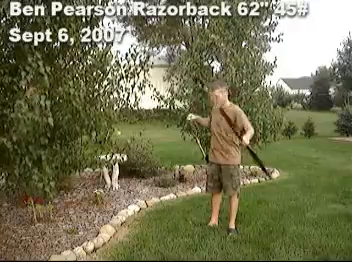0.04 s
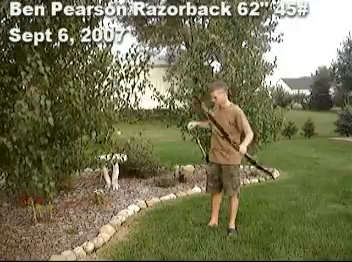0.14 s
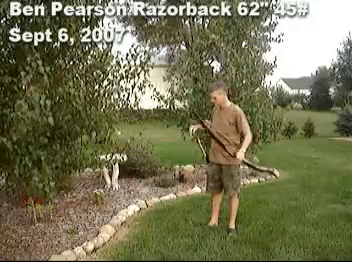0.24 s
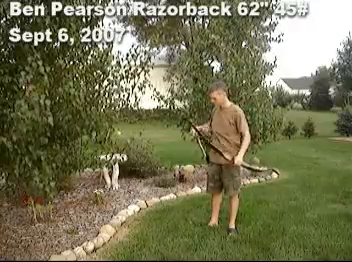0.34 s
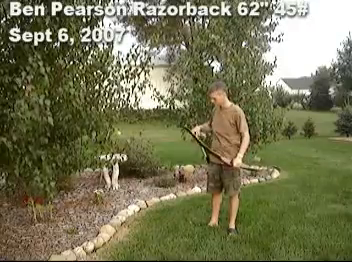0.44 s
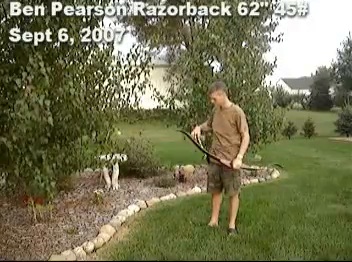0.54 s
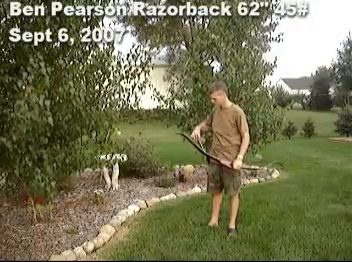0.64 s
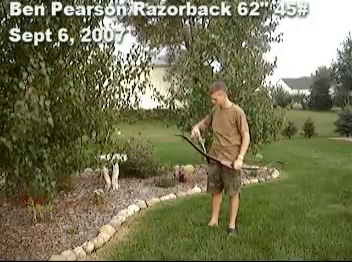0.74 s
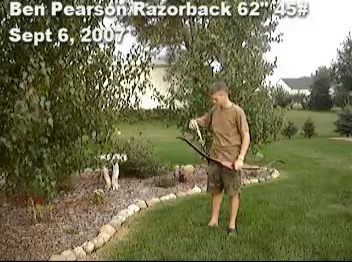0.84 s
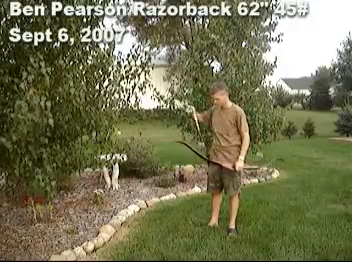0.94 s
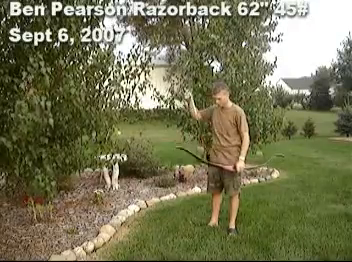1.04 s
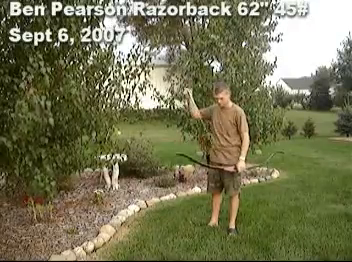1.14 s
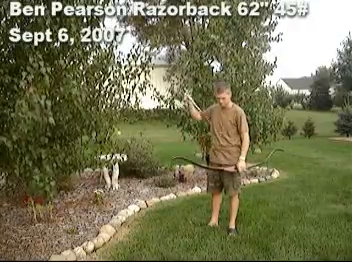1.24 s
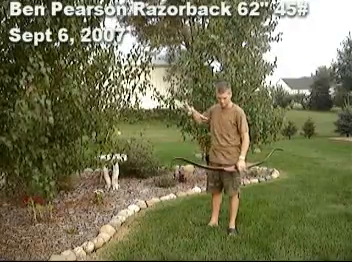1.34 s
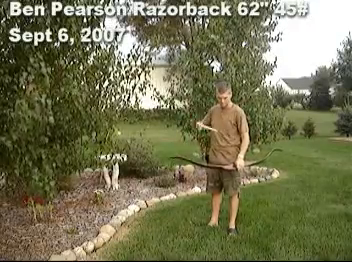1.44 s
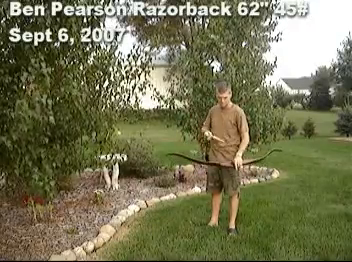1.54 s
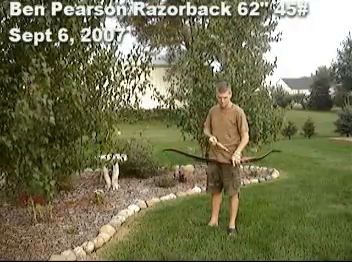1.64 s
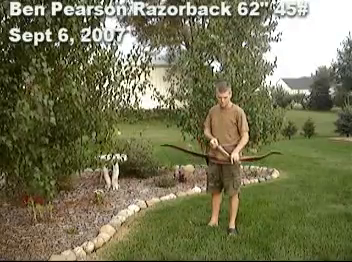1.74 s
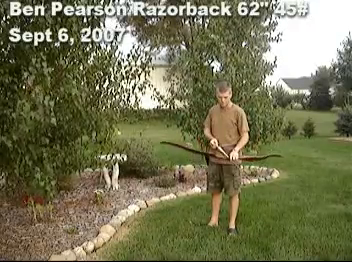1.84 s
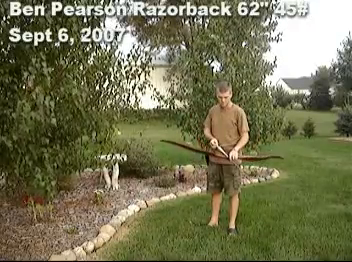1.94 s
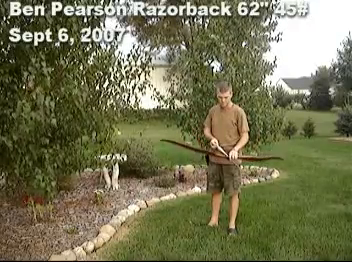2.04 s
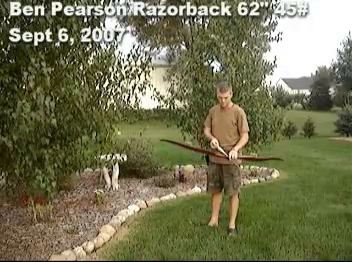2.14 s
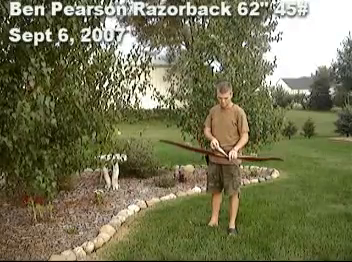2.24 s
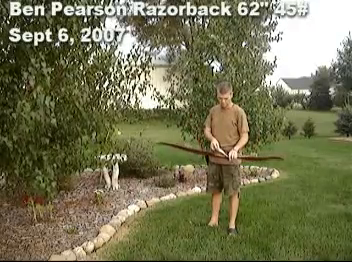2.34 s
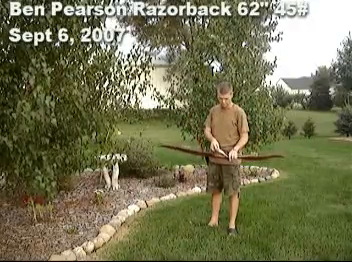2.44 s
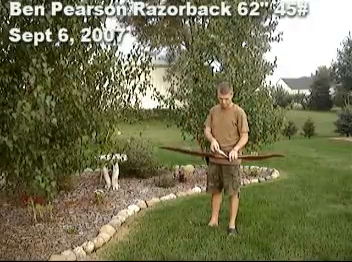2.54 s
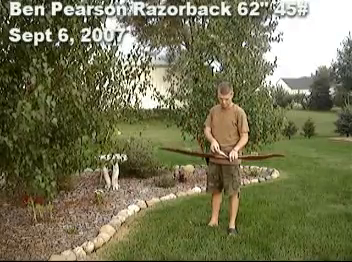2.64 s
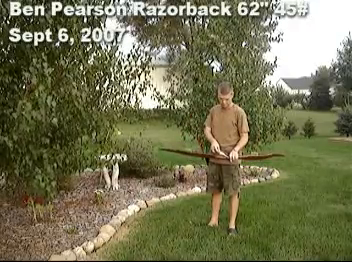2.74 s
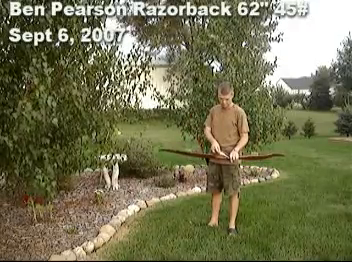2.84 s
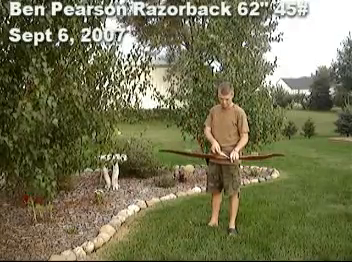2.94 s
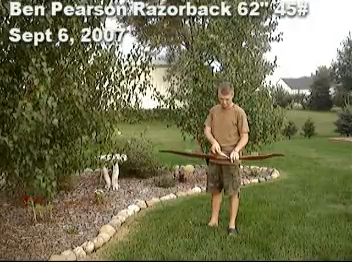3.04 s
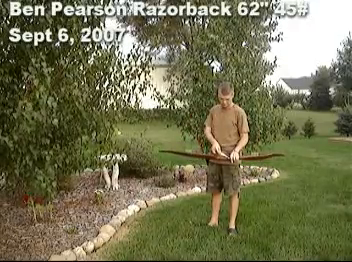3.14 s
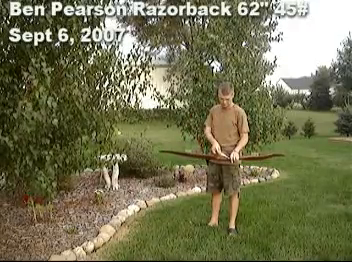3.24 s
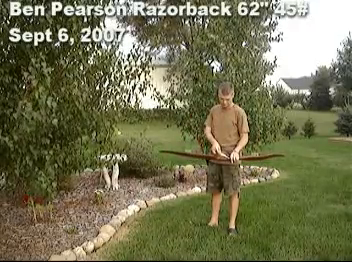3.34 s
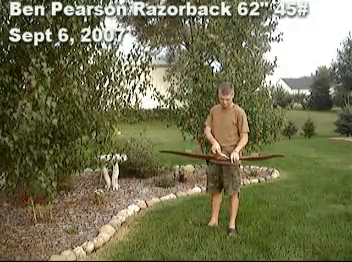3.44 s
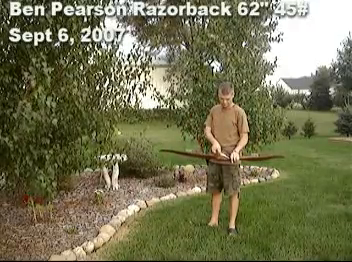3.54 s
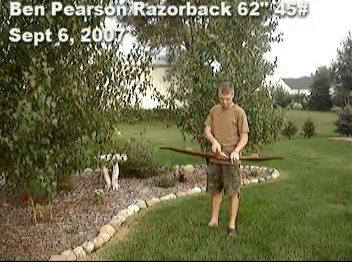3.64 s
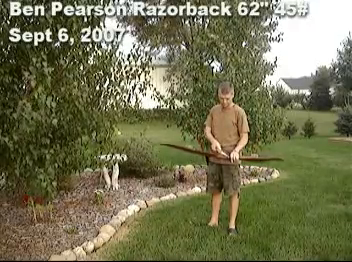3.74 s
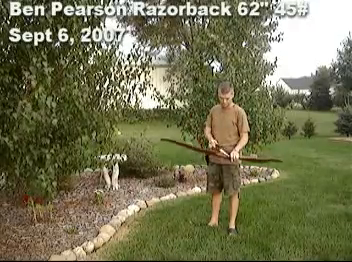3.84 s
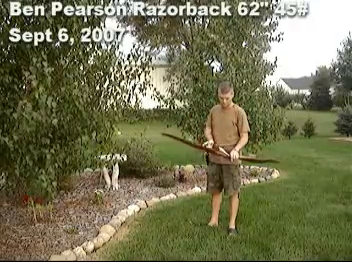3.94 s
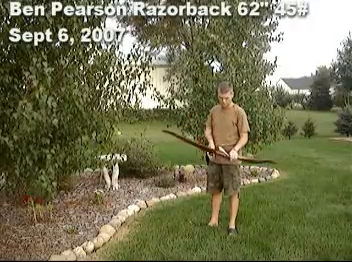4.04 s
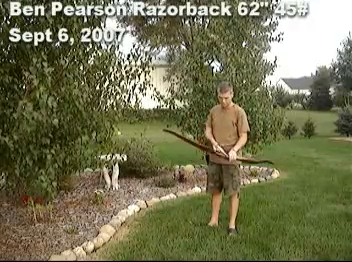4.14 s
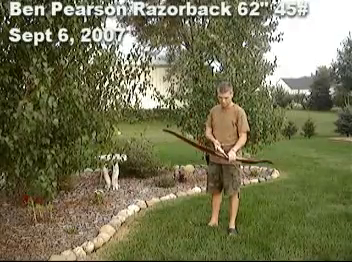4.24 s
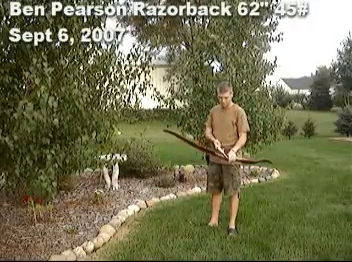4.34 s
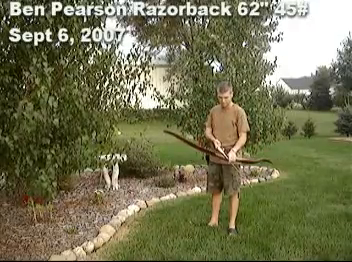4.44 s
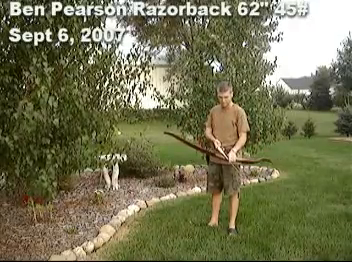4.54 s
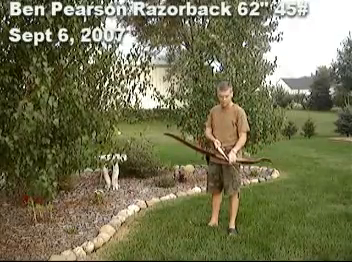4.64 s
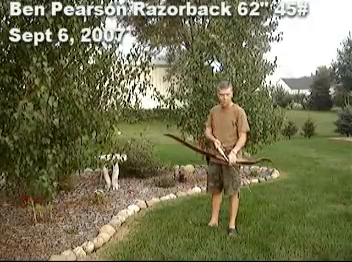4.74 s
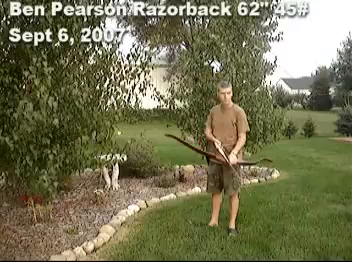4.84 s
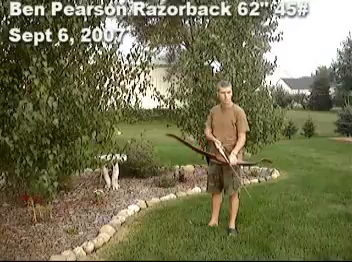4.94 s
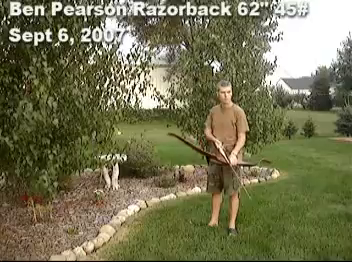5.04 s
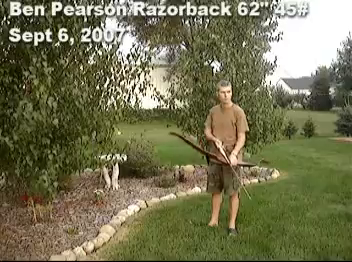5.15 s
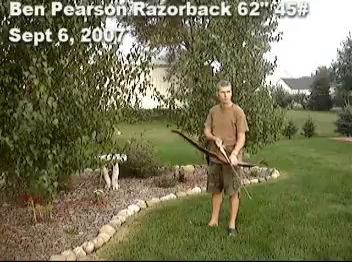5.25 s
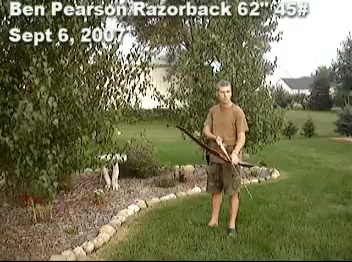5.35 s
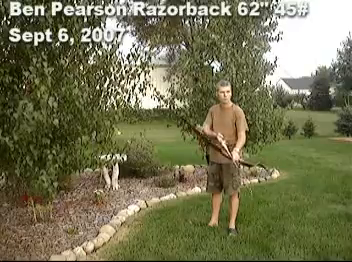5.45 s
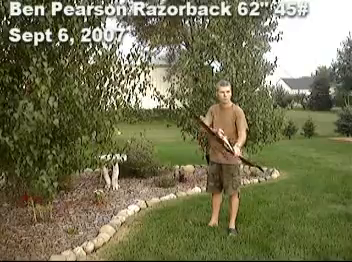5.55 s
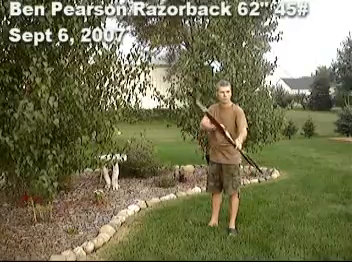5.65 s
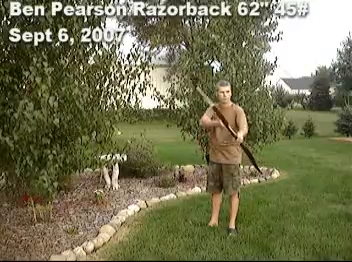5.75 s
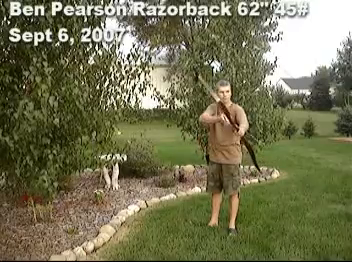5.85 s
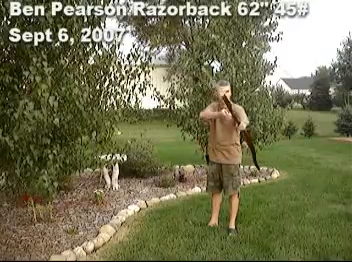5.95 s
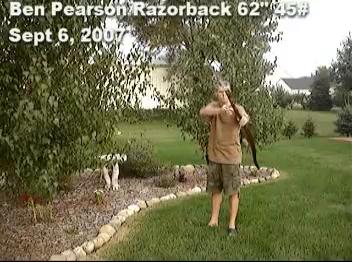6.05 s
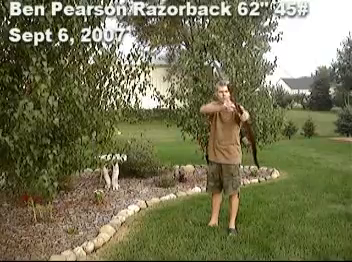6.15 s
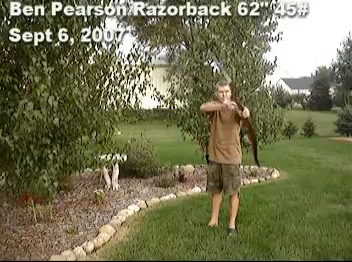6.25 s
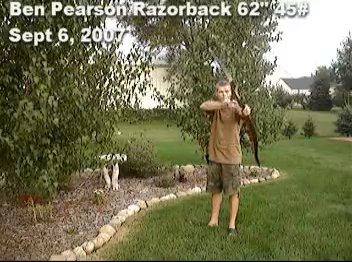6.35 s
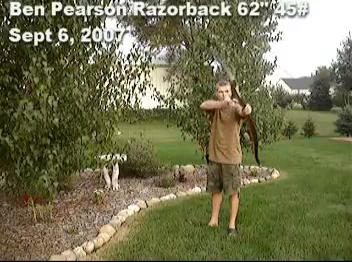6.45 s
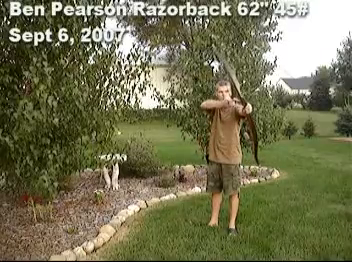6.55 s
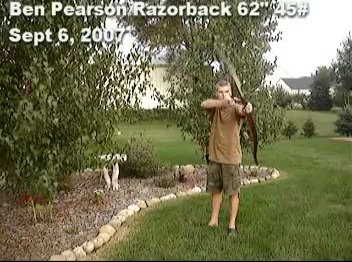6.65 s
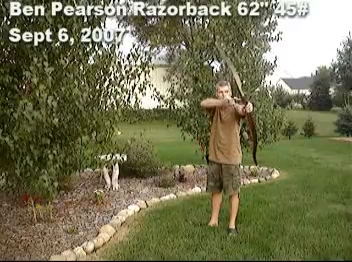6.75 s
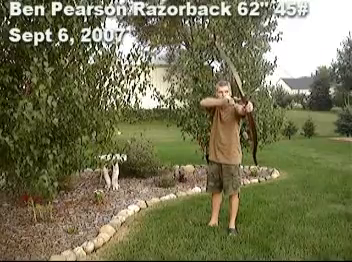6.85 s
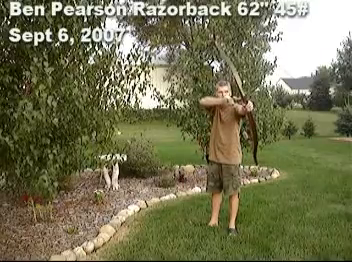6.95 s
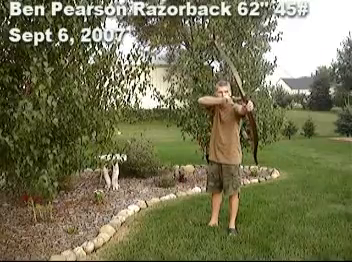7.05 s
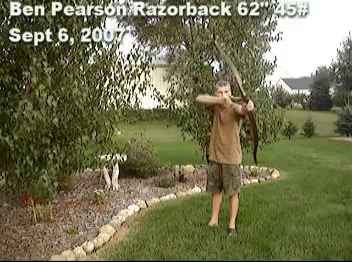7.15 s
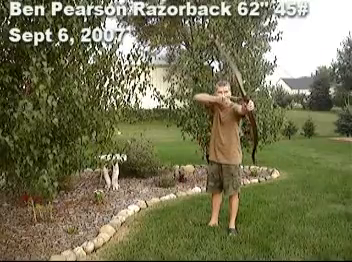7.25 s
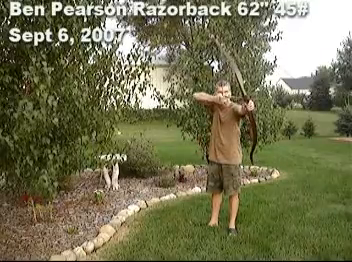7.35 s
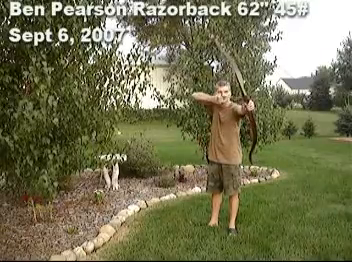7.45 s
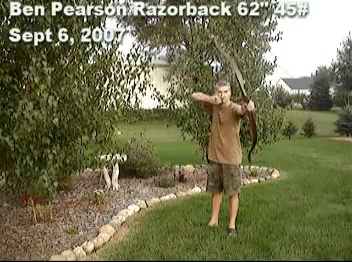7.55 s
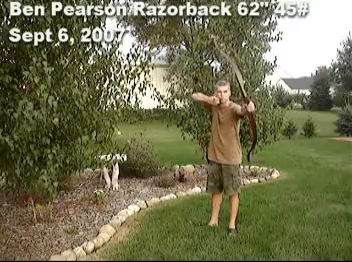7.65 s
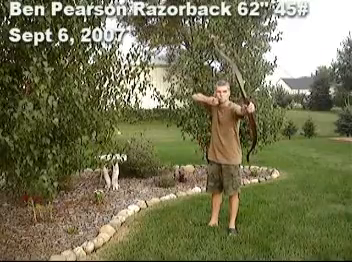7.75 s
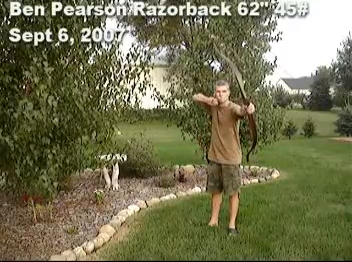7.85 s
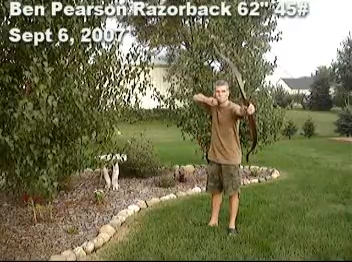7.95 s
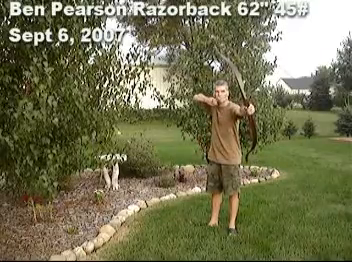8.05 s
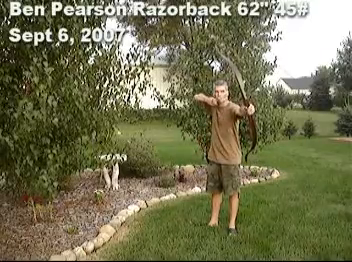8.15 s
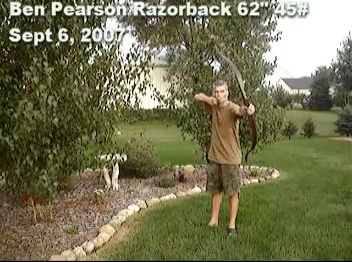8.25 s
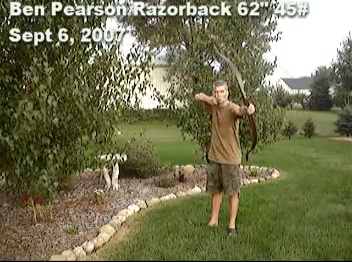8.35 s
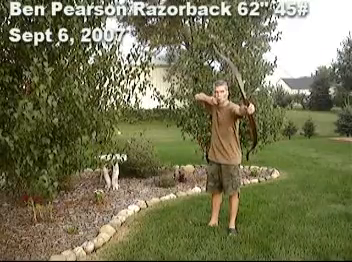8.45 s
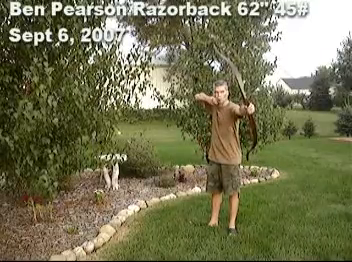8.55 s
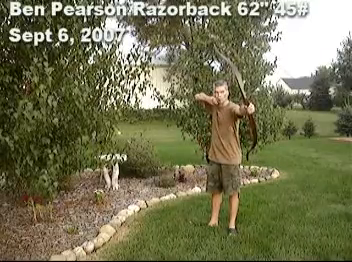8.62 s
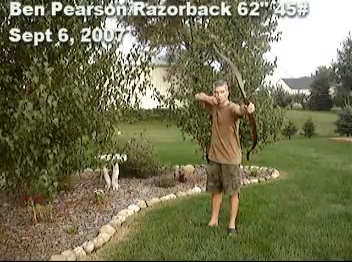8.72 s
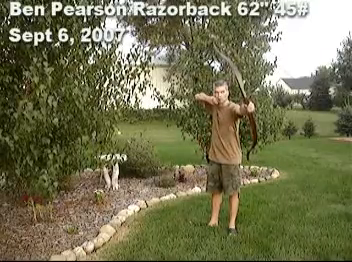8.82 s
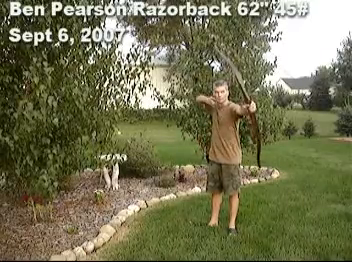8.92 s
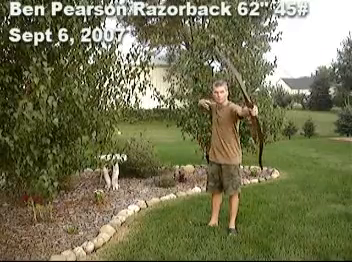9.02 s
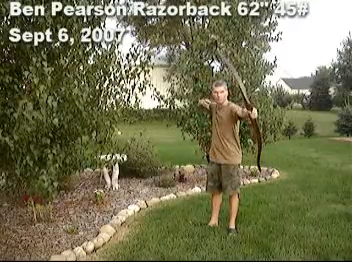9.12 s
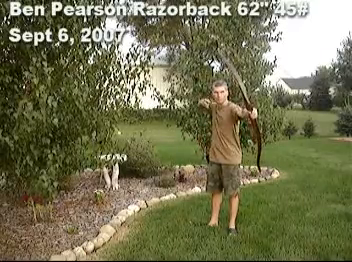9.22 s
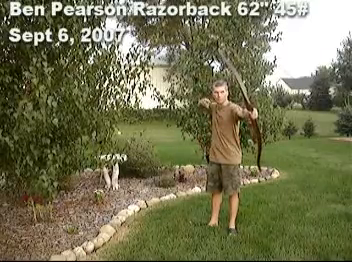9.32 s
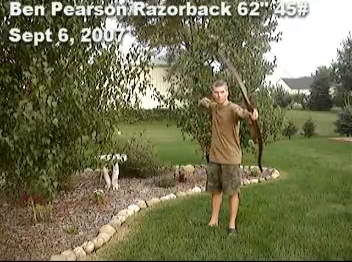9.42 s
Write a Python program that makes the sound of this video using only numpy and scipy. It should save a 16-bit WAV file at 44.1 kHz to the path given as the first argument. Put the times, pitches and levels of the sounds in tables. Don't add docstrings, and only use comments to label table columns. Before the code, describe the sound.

Crickets chirp over faint distant traffic in a quiet garden, light wind rumbling early, then a bow snaps sharply and its arrow smacks into foam.

```python
import sys
import numpy as np
from scipy import signal
from scipy.fft import rfft, irfft
from scipy.io import wavfile
from scipy.ndimage import uniform_filter1d

SR = 44100
rng = np.random.default_rng(int(sys.argv[2]) if len(sys.argv) > 2 else 0)


def decibels_to_gain(level_db):
    exponent = np.asarray(level_db, float) / 20
    return 10 ** exponent


def dump(signal):
    limited = np.clip(np.atleast_2d(signal).T, -1, 1)
    pcm = np.round(limited * 32767).astype(np.int16)
    wavfile.write(sys.argv[1], SR, pcm)


N = 418068
T = np.arange(N) / SR

# start_s, level_db
TRAFFIC_SWELL = [(0.0, -42.5), (0.84, -40.5), (1.0, -39.5), (1.24, -40.5), (1.82, -40.5), (2.32, -40),
                 (2.83, -41), (3.19, -40), (4.04, -42), (6.2, -43), (6.97, -42.5), (8.53, -42), (9.48, -43)]
# frequency_hz, density_db (per Hz)
TOWN_SPECTRUM = [(15, -30), (30, -11), (100, -8.5), (260, -5), (500, -4.5), (880, -0.5), (1300, -3.5),
                 (1800, -6.5), (2150, -13), (3000, -17), (4300, -19.5), (6400, -26.5), (8600, -27.5),
                 (11900, -34)]
# centre_s, peak_db, pitch_hz, half_length_s
BUFFETS = [(.01, -33, 70, 0.032), (0.121, -31.5, 170, 0.045), (.15, -30.5, 80, 0.042),
           (0.256, -27.5, 101, 0.048), (.375, -28, 91, 0.048), (.457, -23.5, 130, .02),
           (0.566, -21, 113, 0.034), (.93, -36, 60.3, 0.076), (1.019, -36, 70, .04),
           (1.65, -34.5, 90.6, 0.048), (1.85, -30, 128, .065), (.72, -36.5, 200, 0.11),
           (2.495, -36, 90, .03), (4.57, -41, 100, 0.0404), (4.98, -41, 80, 0.036)]
# pitch_hz, level_db, stroke_rate_ratio
TRILLERS = [(3615, -6.5, 1.1), (3566, -6, .96), (3632, -8.5, 1.05), (3490, -8.5, 0.81)]
# start_s, level_db
HIGH_INSECT = [(0, -85), (5.3, -82), (5.7, -65.5), (9.48, -69)]
# first_stroke_s, peak_db
LOW_CHIRPS = [(.13, -49), (.255, -56), (1.035, -50), (1.765, -56), (2.08, -49.5), (2.824, -50.5),
              (3.423, -50), (4.245, -51.5), (5.055, -54), (5.596, -51), (6.15, -57), (6.49, -53),
              (7.029, -53), (7.745, -54), (8.0, -50), (8.789, -48.5)]
MID_CHIRPS = [(.062, -57), (.368, -54), (.917, -55), (1.48, -52), (1.951, -55), (2.43, -58), (3.01, -57),
              (3.098, -52), (3.581, -53), (3.99, -57), (4.08, -55), (4.489, -55), (4.94, -57), (5.041, -53),
              (5.365, -54), (5.47, -50), (5.964, -54.5), (6.19, -57), (6.445, -52.5), (6.82, -57),
              (6.906, -51), (7.445, -51), (8.005, -53), (8.445, -53)]
UPPER_CHIRPS = [(.664, -51), (1.168, -52), (1.665, -54), (2.147, -53), (2.673, -50), (3.205, -54),
                (3.668, -54), (4.17, -55), (4.567, -50), (5.062, -54), (5.72, -52), (6.036, -51),
                (6.535, -53), (6.985, -53), (7.305, -51), (7.765, -54), (8.185, -53), (8.502, -49)]
HIGH_CHIRPS = [(.376, -56), (.79, -59), (1.4, -58), (2.245, -55), (2.72, -58), (3.165, -60), (3.717, -56),
               (4.55, -55), (5.78, -52), (6.97, -57), (7.197, -54), (7.76, -59), (8.235, -53)]
# chirps, pitch_hz, stroke_gap_s, pitch_fall (share lost through a stroke)
CHIRPERS = [
    (LOW_CHIRPS, 4620, .046, .075),
    (MID_CHIRPS, 4780, .042, .045),
    (UPPER_CHIRPS, 4840, .043, .055),
    (HIGH_CHIRPS, 5240, .044, .035),
]
STROKE_DB = [-3, 2, 2.0, -5]
# start_s, peak_db, start_hz, end_hz, driven_s, t60_s
SQUEAKS = [
    (.965, -37, 1470, 1590, 0.028, .03),
    (1.115, -38, 1715, 1496, .045, .03),
]
# peak_s, peak_db, rise_s, t60_s, centre_hz
HANDLING = [(1.05, -50, .06, .5, 4500), (1.15, -51, 0.023, .15, 4000), (2.075, -50, .004, .06, 8000),
            (3.637, -38, 0.0025, 0.032, 3000), (3.865, -54, .003, .05, 7570), (3.9, -55, .01, .12, 8200),
            (4.735, -56, .003, .08, 8300), (5.82, -50, .003, .06, 6000), (8.09, -51, .003, 0.053, 8020),
            (8.9944, -30, 0.00124, .006, 1300), (8.9975, -28, 0.00089, .02, 6200),
            (9.0105, -26, .002, .025, 6200)]
# start_s, peak_db, start_hz, end_hz, driven_s, t60_s
BOW_RINGS = [(8.9955, -9, 439, 449, 0.0068, 0.04), (9.004, -18.5, 2000, 3070, 0.0048, 0.0067),
             (9.0105, -18, 1350, 990, 0.0048, 0.014), (9.011, -21, 496, 440, 0.005, 0.044),
             (9.016, -16.5, 1460, 1506, 0.0073, 0.036), (9.026, -29, 1470, 1510, .008, .04),
             (9.006, -22, 655, 604, .01, .06), (9.012, -23, 2350, 2430, 0.0074, 0.032),
             (9.03, -35, 340, 312, 0.042, 0.071), (9.05, -30.5, 617, 557, 0.033, .05)]
TARGET_RINGS = [(9.36095, -5.5, 690, 620, .0011, .005), (9.3612, -11, 2660, 1890, 0.003, 0.0084),
                (9.3665, -15.5, 686, 460, 0.0109, 0.0038), (9.3618, -23, 3360, 3200, 0.0043, 0.0071),
                (9.363, -32, 1200, 990, .002, 0.024), (9.368, -27, 1800, 2040, .004, 0.009),
                (9.374, -34, 2600, 2300, 0.0023, .008), (9.362, -22.5, 340, 270, 0.011, 0.07),
                (9.362, -43, 83, 107, 0.017, 0.18)]
# peak_s, peak_db, rise_s, t60_s
BOW_CRACKS = [(8.9965, -13, 0.00094, 0.032), (8.9992, -14, 0.00089, 0.018), (9.007, -14, .001, 0.025),
              (9.0102, -15.5, .001, 0.025), (9.017, -13.5, 0.0022, .012), (9.025, -25, 0.0022, 0.13),
              (9.065, -28, .003, 0.086)]
TARGET_CRACKS = [
    (9.3617, -11, 0.00048, 0.011),
    (9.3595, -31, 0.0026, .01),
    (9.388, -34, .002, 0.035),
]
# frequency_hz, density_db (per Hz)
CRACK_SPECTRUM = [(120, -54), (200, -12.5), (455, -9.5), (1170, -11.5), (2390, -12.5), (3900, -19),
                  (8850, -24), (11900, -40), (13000, -85)]
# delay_s, level_db
BOW_ECHO = [(.015, -38), (.03, -15.5), (.05, -25), (.065, -19.5), (.09, -27.5), (.11, -26), (.17, -34),
            (.3, -49)]
TARGET_ECHO = [(.018, -47), (0.025, -19), (.04, -20.5), (.055, -21), (.075, -28), (.1, -34), (.13, -38)]
# frequency_hz, level_db
ECHO_COLOUR = [(100, 7.5), (500, -4), (2000, -5), (4500, 2), (7000, -3.5), (13000, 1)]
# centre_s, length_s, above_hz
DROPOUTS = [(9.3525, .008, 2100), (9.3795, .006, 3200), (8.99, .003, 2500), (9.0042, .003, 3400),
            (9.0215, .004, 4500), (8.987, .028, 10400), (9.357, .03, 10600)]
# frequency_hz, share_of_frames
APART = [(300, .01), (1500, .01), (2500, .07), (3100, .1), (3700, .35), (4400, .08), (7000, .05),
         (9000, .015), (11500, .07)]


def curve(table):
    start_s, level_db = np.transpose(table)
    return np.interp(T, start_s, level_db)


def colour(x, points):
    hz, db = np.transpose(points)
    f = np.maximum(np.fft.rfftfreq(len(x), 1 / SR), 1)
    gain = decibels_to_gain(np.interp(np.log(f), np.log(hz), db))
    return irfft(rfft(x) * gain, len(x))


def unit(x):
    return x / np.sqrt(np.mean(x ** 2))


def band(n, hz, width_hz):
    f = np.fft.rfftfreq(n, 1 / SR)
    bell = np.exp(-((f - hz) / width_hz) ** 2)
    return unit(irfft(rfft(rng.standard_normal(n)) * bell, n))


def walk(rate_hz):
    k = int(SR / rate_hz)
    held = np.repeat(rng.standard_normal(N // k + 1), k)
    return unit(uniform_filter1d(uniform_filter1d(held, k), k)[:N])


def add(out, start_s, piece):
    i = max(int(start_s * SR), 0)
    out[i:i + len(piece)] += piece[:N - i]


def burst(rise_s, t60_s):
    t = T[:SR // 2] - 3 * rise_s
    return np.where(t < 0, np.exp(-(t / rise_s) ** 2), decibels_to_gain(-60 * np.maximum(t, 0) / t60_s))


def rings(table, rise_s, rough):
    out, t = np.zeros(N), T[:SR // 4]
    for start_s, peak_db, hz, end_hz, driven_s, t60_s in table:
        pitch_hz = np.interp(t, [0, driven_s], [hz, end_hz])
        phase = 2 * np.pi * np.cumsum(pitch_hz) / SR
        decay = decibels_to_gain(-60 * np.maximum(t - driven_s, 0) / t60_s)
        shape = np.minimum(t / rise_s, 1) * decay
        waver = rough * band(len(t), 0, 0.14 * hz) * np.minimum(t * hz / 3, 1)
        add(out, start_s, decibels_to_gain(peak_db) * shape * (1 + waver) * np.sin(phase + waver))
    return out


def town():
    f = np.fft.rfftfreq(N, 1 / SR)
    spectrum = rfft(colour(rng.standard_normal(N), TOWN_SPECTRUM))
    reference = irfft(spectrum * (f > 500) * (f < 1600), N)
    spectrum = spectrum / np.sqrt(np.mean(reference ** 2))
    octaves = np.log2(np.maximum(f, 1) / 1000)
    swell_db, out = curve(TRAFFIC_SWELL), 0
    for step in range(-6, 5):
        window = np.cos(np.pi / 2 * np.clip(octaves - step, -1, 1)) ** 2
        part = irfft(spectrum * window, N)
        follow = np.clip(1 - (step - .4) / 1.8, 0, 1)
        level_db = follow * swell_db + (1 - follow) * np.mean(swell_db) + .7 * walk(4)
        out = out + part * decibels_to_gain(level_db)
    return out


def wind():
    calm_db, gust_db, gust_fade_s = -58, 11, 1.34
    gust = gust_db * np.exp(-T / gust_fade_s)
    level_db = calm_db + gust + 1.2 * walk(3.02) + 3.0 * walk(14)
    out = decibels_to_gain(level_db) * band(N, 82, 60)
    for centre_s, peak_db, hz, half_length_s in BUFFETS:
        n = int(2 * half_length_s * SR)
        flutter = decibels_to_gain(2.5 * band(n, 0, 30))
        lump = np.hanning(n) * band(SR // 4, hz, 1.1 * hz)[:n] * flutter
        lump = lump / np.max(np.abs(lump))
        start_s = centre_s - half_length_s
        already_past = max(int(-start_s * SR), 0)
        add(out, start_s, decibels_to_gain(peak_db) * lump[already_past:])
    return out


def trill():
    level_db, strokes_hz = -51.5, 42.3
    out, rate_hz = 0, strokes_hz * (1 + .03 * walk(3))
    for hz, db, ratio in TRILLERS:
        stroke = np.cumsum(ratio * rate_hz * (1 + 0.02786 * walk(6))) / SR
        throb = (.5 - .5 * np.cos(2 * np.pi * stroke)) * decibels_to_gain(db + 1.35 * walk(9))
        swing_hz = 35 * np.sin(2 * np.pi * stroke)
        pitch_hz = hz + 18 * walk(12) + 12 * walk(2) + swing_hz
        out = out + throb * np.sin(2 * np.pi * np.cumsum(pitch_hz) / SR)
    return decibels_to_gain(level_db + 0.43 * walk(3)) * unit(out)


def chirps():
    stroke_s, scatter_db, chirp_detune = .019, 1.5, 0.0076
    out, t = np.zeros(N), T[:int(stroke_s * SR)]
    shape = np.sin(np.pi * t / t[-1])
    for table, hz, gap_s, fall in CHIRPERS:
        sag = 2 * np.pi * hz * (t + fall / 2 * (t - t ** 2 / t[-1]))
        chances = rng.standard_normal((len(table), len(STROKE_DB), 5))
        for (first_s, peak_db), chance in zip(table, chances):
            tune = 1 + chirp_detune * chance[0, 4]
            for k, (late, detune, loud, size, _) in enumerate(chance):
                start_s = first_s + k * gap_s - stroke_s / 2
                level_db = peak_db + STROKE_DB[k] + scatter_db * size
                rasp = 1 + 0.36 * band(len(t), 0, 220)
                add(out, start_s, decibels_to_gain(level_db) * shape * rasp * np.sin(tune * sag))
                answer = shape * np.sin((1 + 0.0306 * detune) * sag)
                add(out, start_s + .016 + .008 * late, decibels_to_gain(level_db - 5.5 + 2.5 * loud) * answer)
    t = T[:SR // 10]
    hedge = rng.standard_normal(len(t)) * decibels_to_gain(-33 - 60 * t / .12)
    chorus = decibels_to_gain(-67.5 + 3 * walk(25)) * band(N, 4700, 380)
    chorus += decibels_to_gain(-68) * band(N, 8520, 330)
    chorus += decibels_to_gain(curve(HIGH_INSECT)) * band(N, 5870, 300)
    chorus += decibels_to_gain(-65.5) * band(N, 2670, 130)
    return out + signal.oaconvolve(out, hedge)[:N] + chorus


def handling():
    shaft_top_hz = 9600
    out = rings(SQUEAKS, .012, rough=.05)
    for peak_s, peak_db, rise_s, t60_s, hz in HANDLING:
        width_hz = min(0.99 * max(shaft_top_hz - hz, 500), 1.1 * hz)
        scrape = band(SR // 2, hz, width_hz)
        add(out, peak_s - 3 * rise_s, decibels_to_gain(peak_db) * burst(rise_s, t60_s) * scrape)
    return out


def blow(ring_table, crack_table, echo_table, rough):
    out, t = rings(ring_table, 0.00051, rough), T[:SR // 2]
    for peak_s, peak_db, rise_s, t60_s in crack_table:
        noise = unit(colour(rng.standard_normal(len(t)), CRACK_SPECTRUM))
        add(out, peak_s - 3 * rise_s, decibels_to_gain(peak_db) * burst(rise_s, t60_s) * noise)
    delay_s, level_db = np.transpose(echo_table)
    echo = decibels_to_gain(np.interp(t, delay_s, level_db, left=-99, right=-99))
    scatter = colour(rng.standard_normal(len(t)) * echo, ECHO_COLOUR) * decibels_to_gain(-26.5)
    return out + signal.oaconvolve(out, scatter)[:N]


def scene():
    duck = decibels_to_gain(-2.5 * (T > 9.0))
    garden = town() + wind() + duck * (trill() + chirps())
    bow = blow(BOW_RINGS, BOW_CRACKS, BOW_ECHO, rough=0.35)
    target = -blow(TARGET_RINGS, TARGET_CRACKS, TARGET_ECHO, rough=0.14)
    mid = garden + handling() + bow + target
    return np.array([mid, mid])


def treble_gaps(mid):
    above_hz, usual_share, after_blow = 4200, .006, 5
    f, t, frames = signal.stft(mid, SR, nperseg=256)
    bands = (f // 1400).astype(int)
    loud = np.interp(t, T, uniform_filter1d(np.abs(mid), size=4096))
    share = usual_share + np.clip(after_blow * (loud - .012), 0, .1)
    quiet_now = np.interp(t, T, uniform_filter1d(np.abs(mid), size=1024)) < .03
    chance = np.repeat(rng.random((bands[-1] + 1, len(t) // 3 + 1)), 3, axis=1)
    empty = chance[bands, :len(t)] < share * quiet_now
    kept = ~(empty & (f > above_hz)[:, None])
    return signal.istft(frames * kept, SR, nperseg=256)[1][:N]


def drop_treble(mid):
    for centre_s, length_s, hz in DROPOUTS:
        near = slice(int((centre_s - .05) * SR), int((centre_s + .05) * SR))
        treble = colour(mid[near], [(.9 * hz, -80), (hz, 0)])
        mid[near] -= treble * np.exp(-((T[near] - centre_s) / (length_s / 2)) ** 6)
    return mid


def limit_band(mid):
    edge_hz, top_hz = 11200, 11900
    f, spectrum = np.fft.rfftfreq(N, 1 / SR), rfft(mid)
    top = irfft(spectrum * (f >= edge_hz) * (f < top_hz), N)
    swell_db = curve(TRAFFIC_SWELL)
    busy = swell_db - np.mean(swell_db) + 30 * uniform_filter1d(np.abs(mid), size=1024)
    kept = uniform_filter1d(1. * (walk(45) + .8 * busy > .55), size=512)
    return irfft(spectrum * (f < edge_hz), N) + kept * top


def high_band():
    start_s, end_s, hold_s, fade_db_per_s = 9.028, 9.14, .045, 220
    fade_db = fade_db_per_s * np.clip(T - start_s - hold_s, 0, 1)
    gate = uniform_filter1d(1. * (T > start_s) * (T < end_s), size=512)
    return gate * decibels_to_gain(-60 - fade_db) * band(N, 12900, 600)


def apart(mid, db):
    f, _, frames = signal.stft(mid, SR, nperseg=2048)
    bands = (f // 600).astype(int)
    share = np.interp(f, *np.transpose(APART))[:, None]
    chosen = rng.random((bands[-1] + 1, frames.shape[1]))[bands] < share
    turn = np.exp(2j * np.pi * rng.random(frames.shape))
    return decibels_to_gain(db) * signal.istft(frames * chosen * turn, SR, nperseg=2048)[1][:N]


def band_limit(x):
    return signal.sosfilt(signal.butter(12, 13800, fs=SR, output="sos"), x)


def record(dry):
    mid = treble_gaps(2 * np.tanh(dry[0] / 2))
    mid = limit_band(drop_treble(mid)) + high_band()
    side = apart(mid, db=-12.5)
    return band_limit(np.array([mid + side, mid - side]))


dry = scene()
out = record(dry)
dump(out)
```